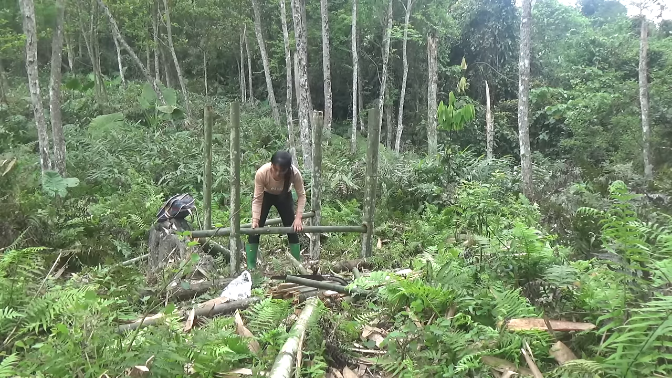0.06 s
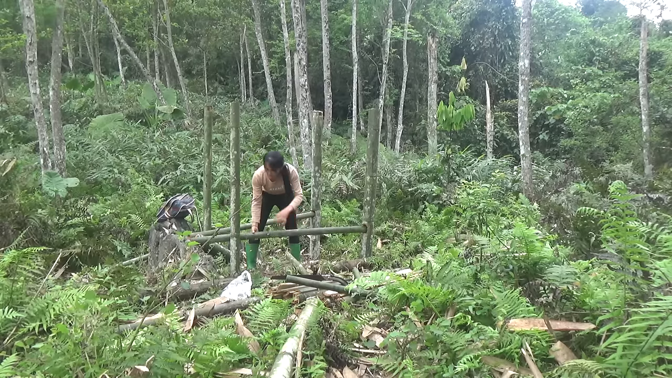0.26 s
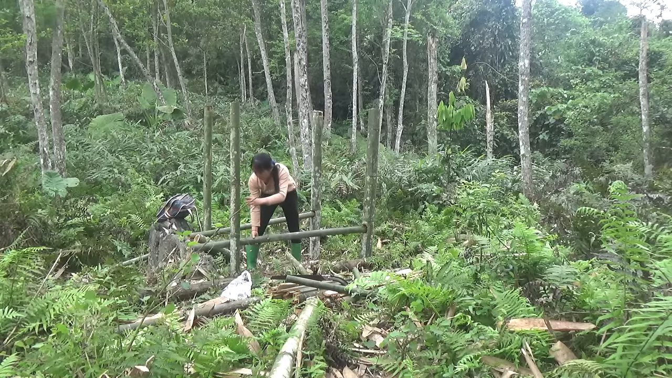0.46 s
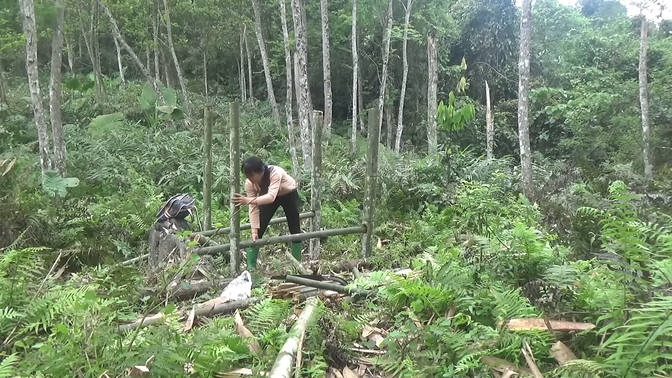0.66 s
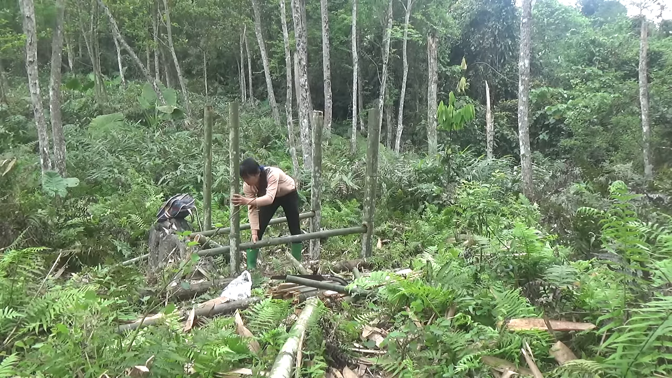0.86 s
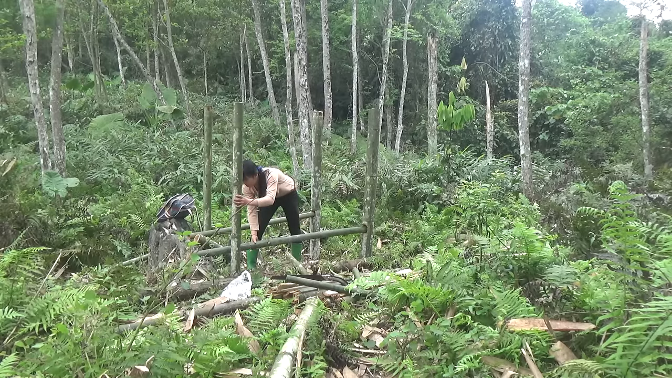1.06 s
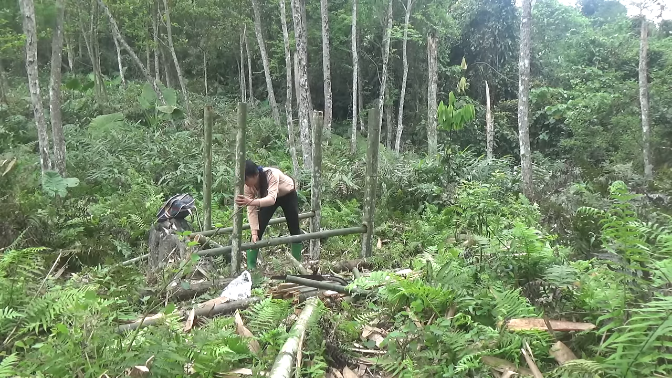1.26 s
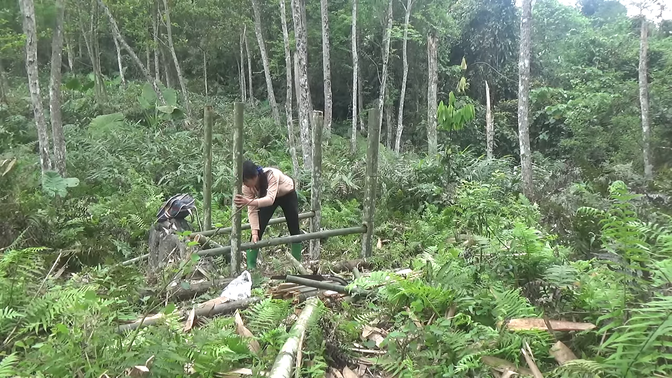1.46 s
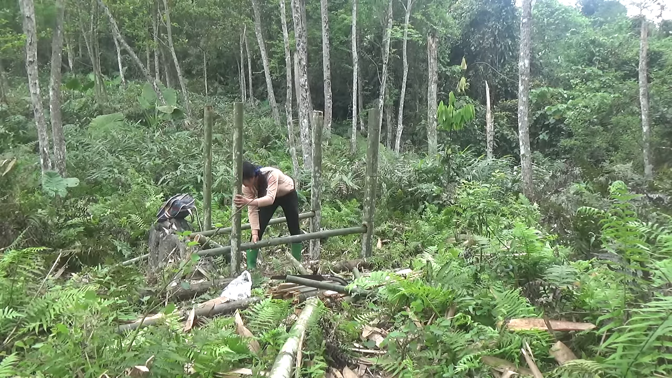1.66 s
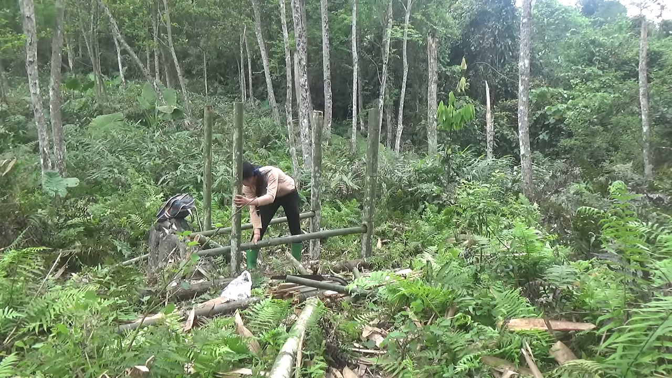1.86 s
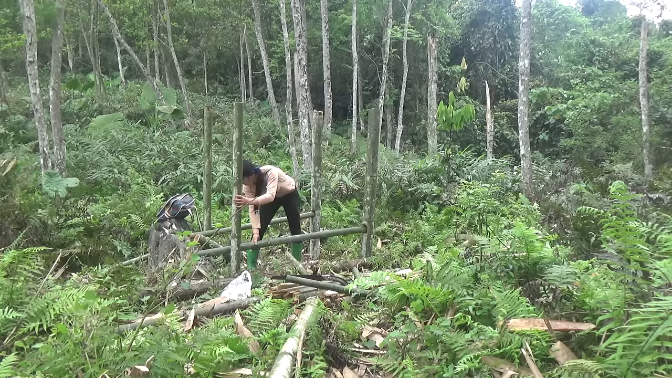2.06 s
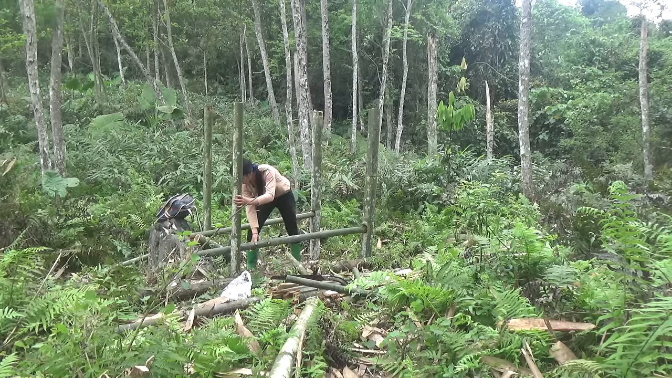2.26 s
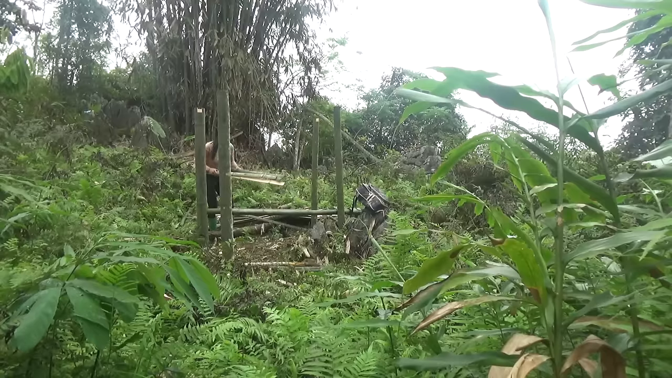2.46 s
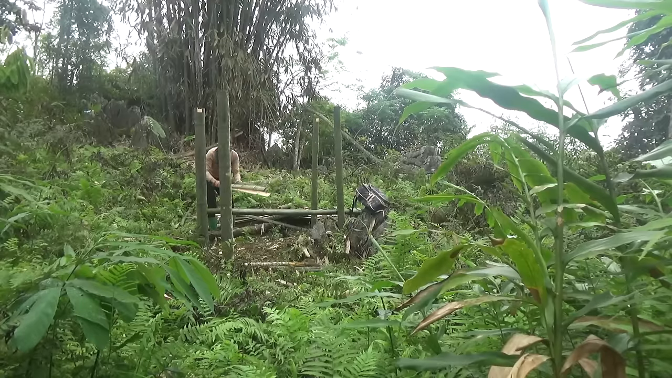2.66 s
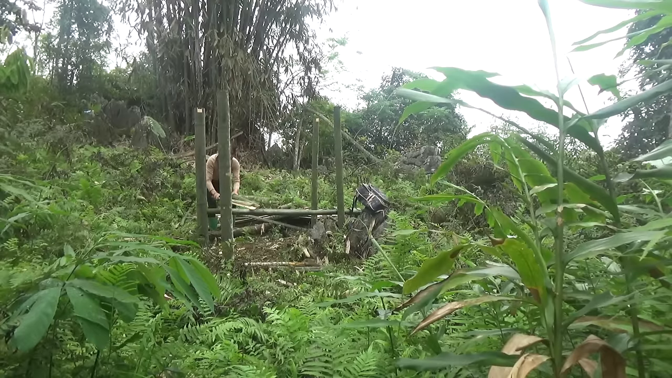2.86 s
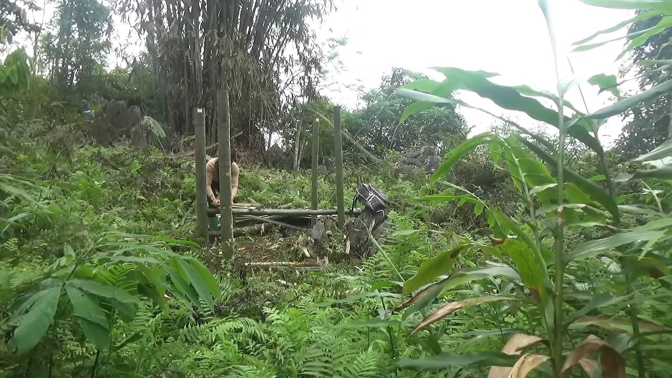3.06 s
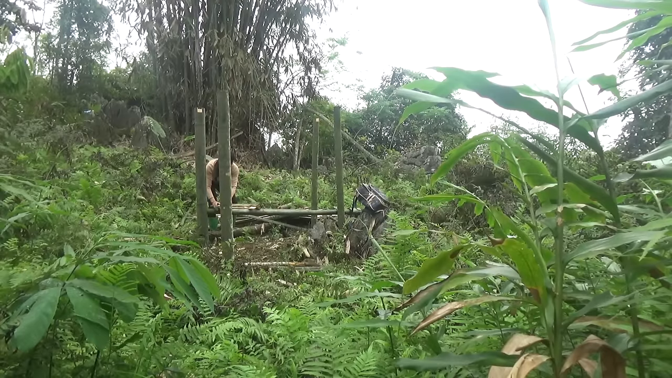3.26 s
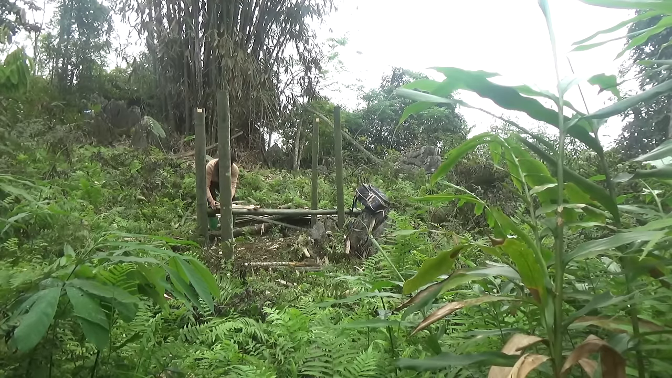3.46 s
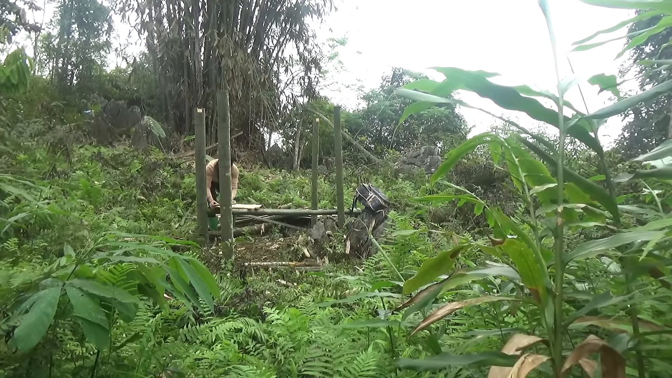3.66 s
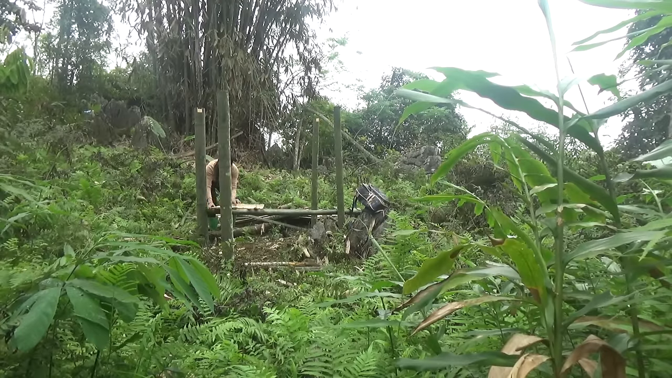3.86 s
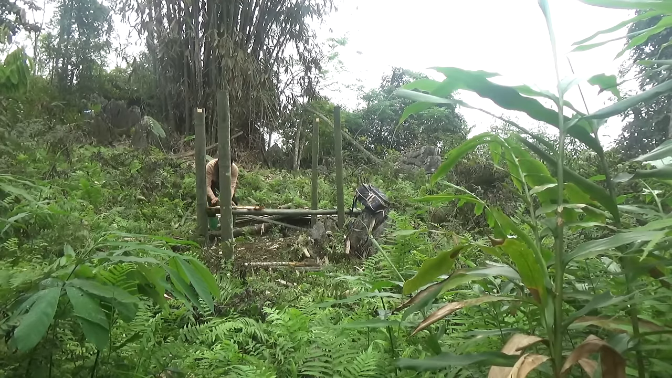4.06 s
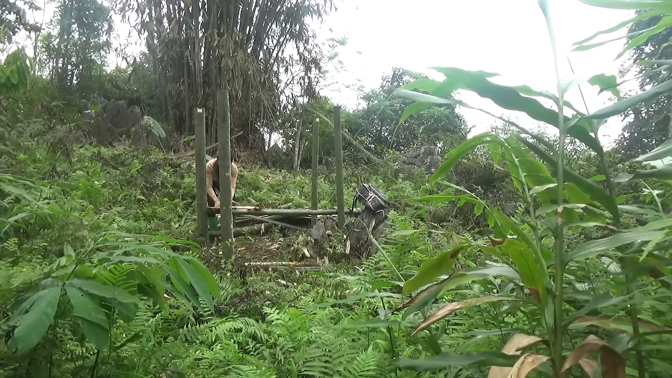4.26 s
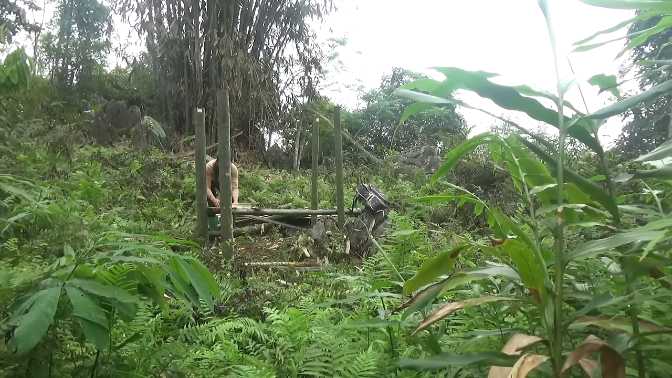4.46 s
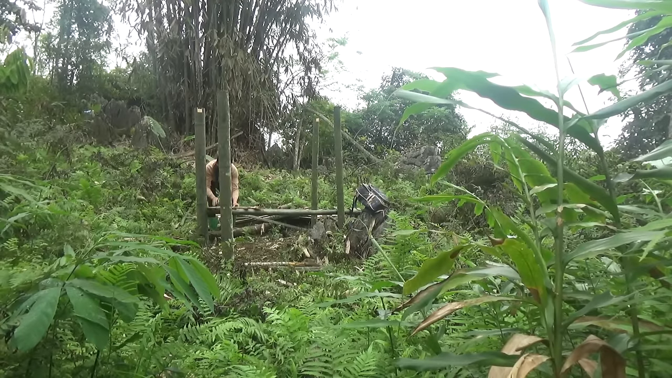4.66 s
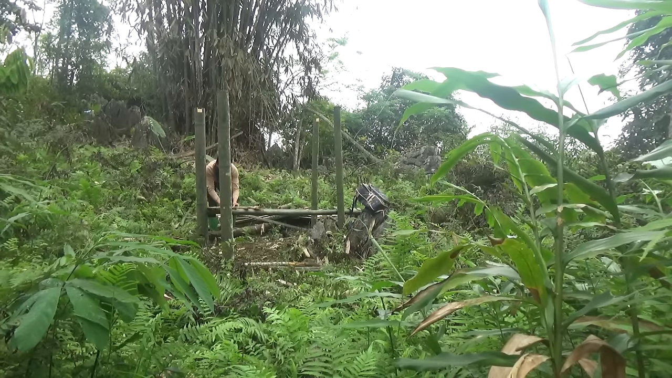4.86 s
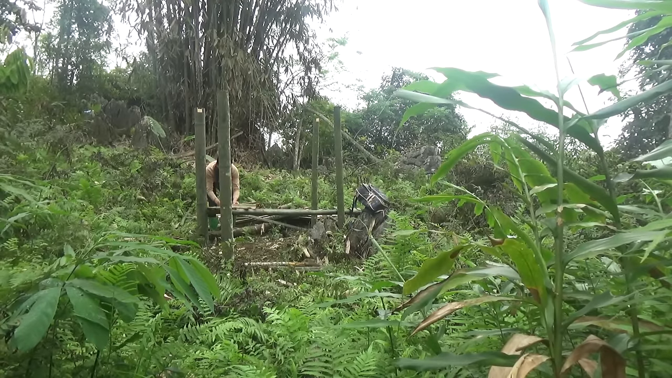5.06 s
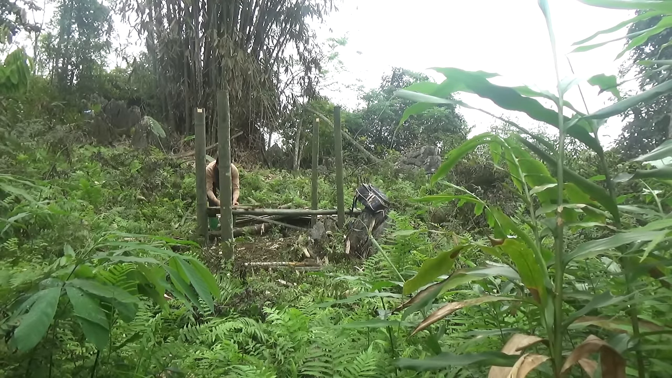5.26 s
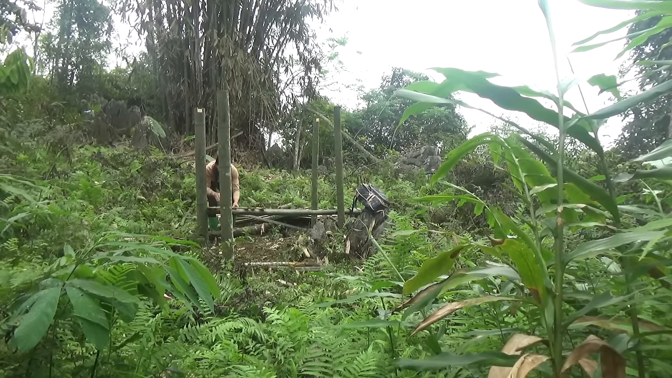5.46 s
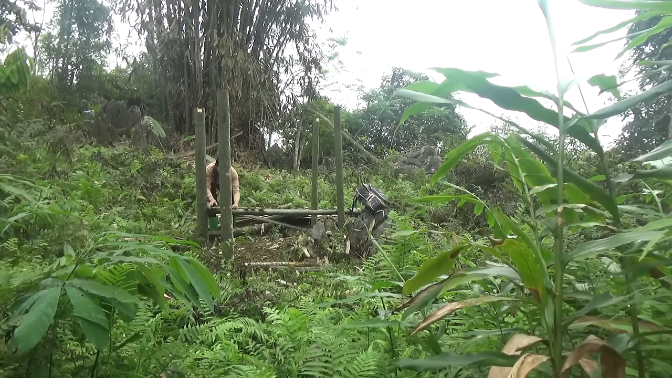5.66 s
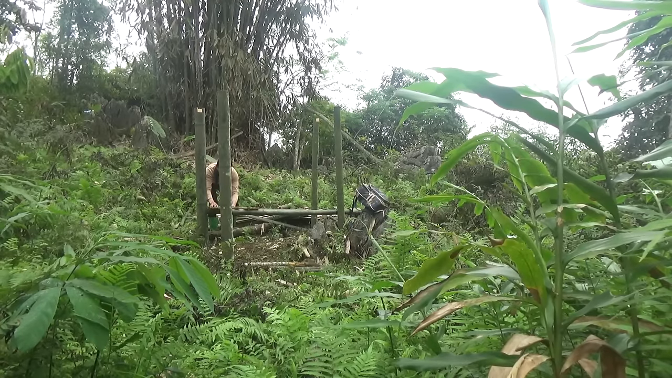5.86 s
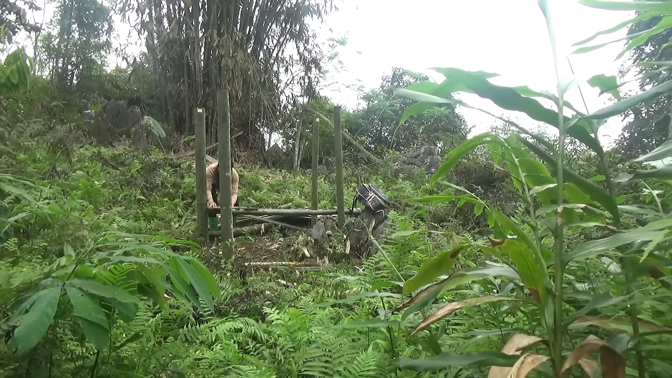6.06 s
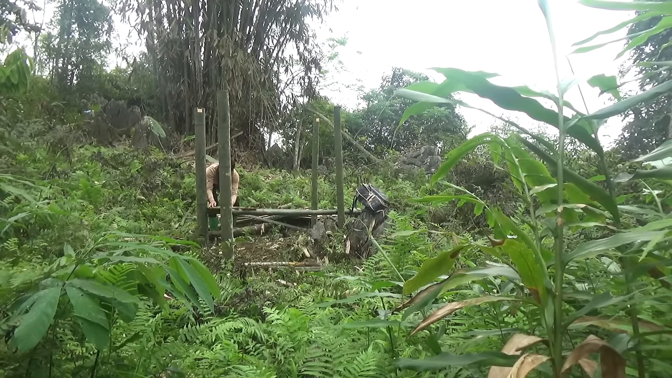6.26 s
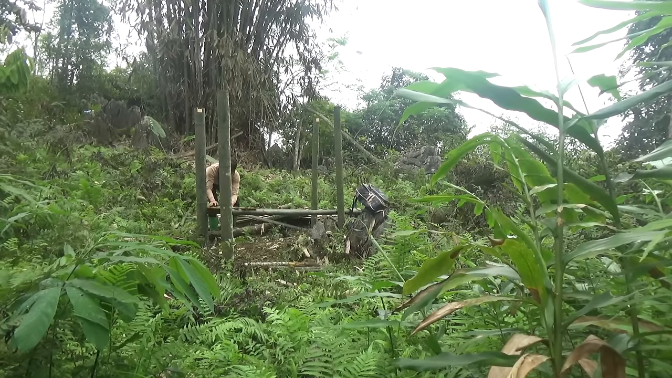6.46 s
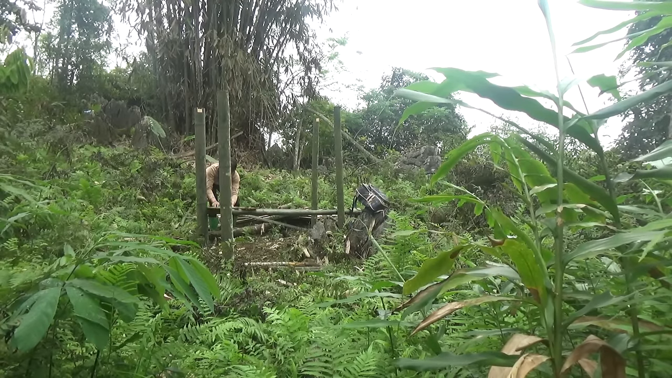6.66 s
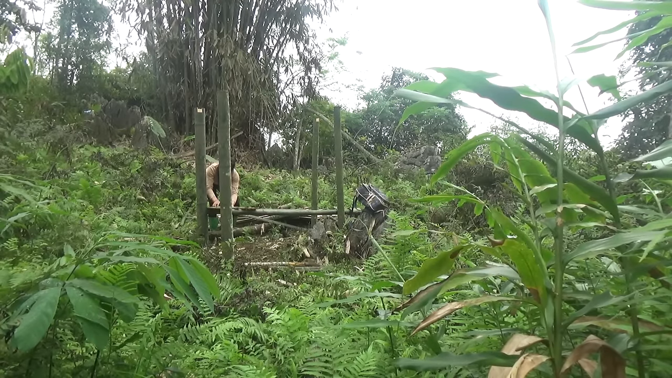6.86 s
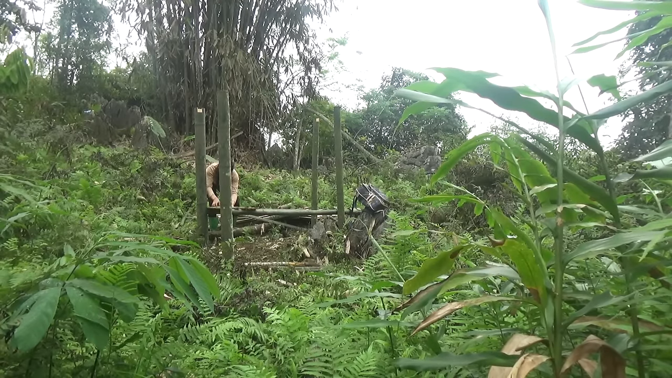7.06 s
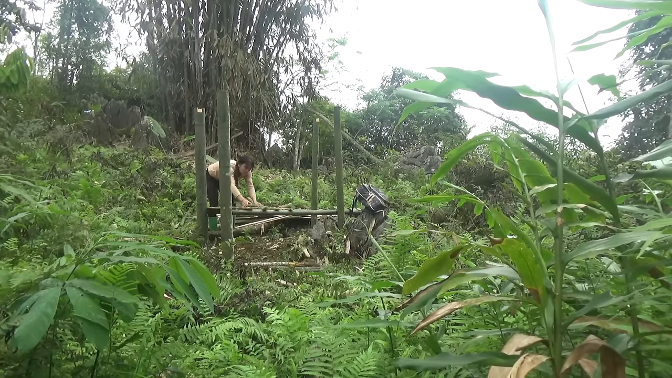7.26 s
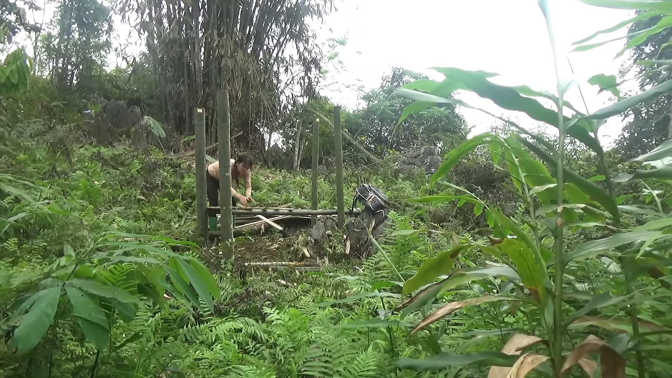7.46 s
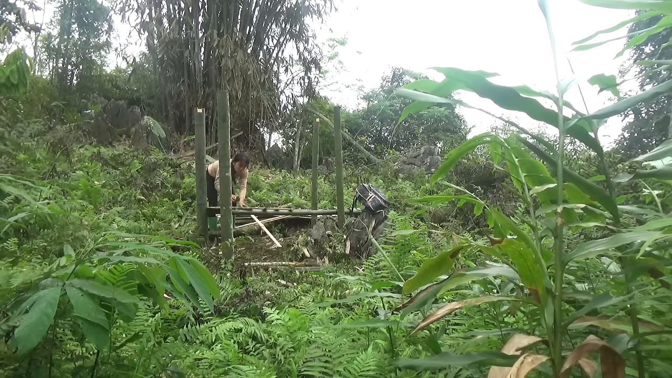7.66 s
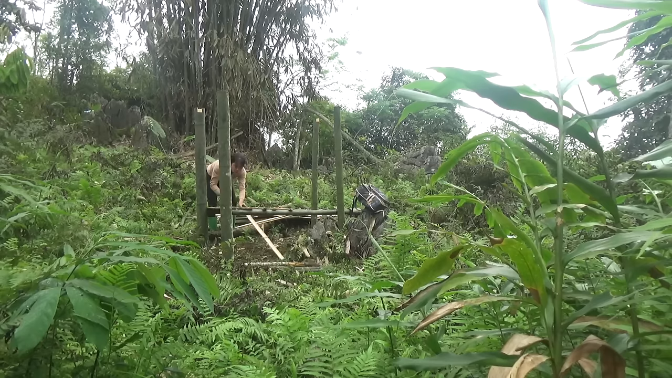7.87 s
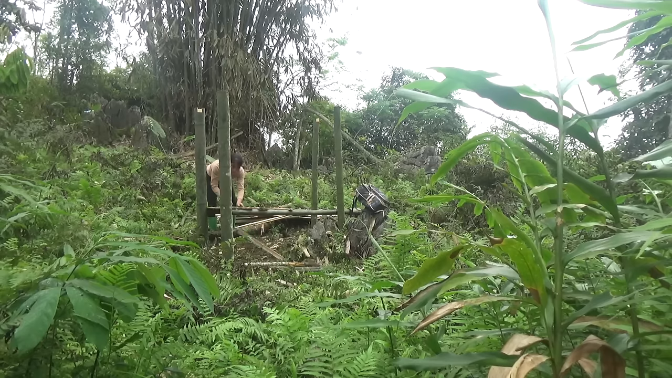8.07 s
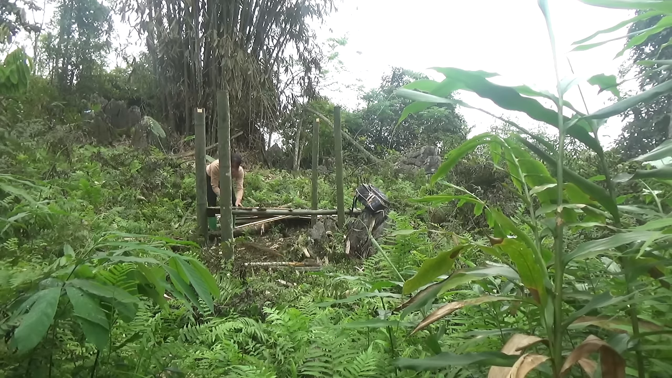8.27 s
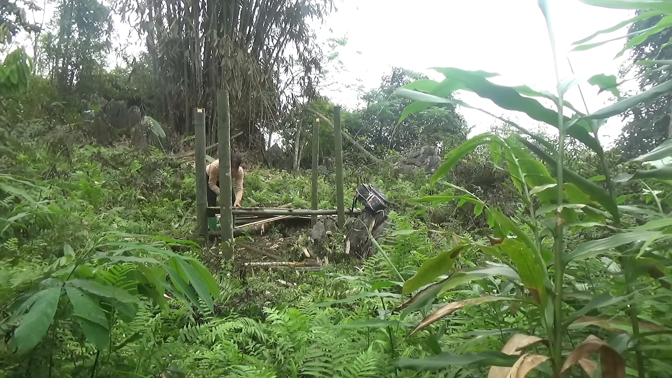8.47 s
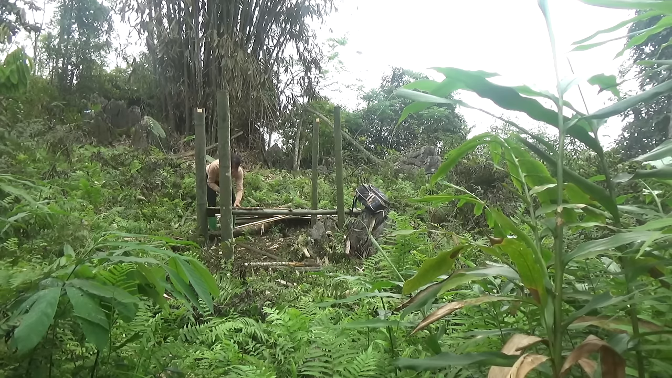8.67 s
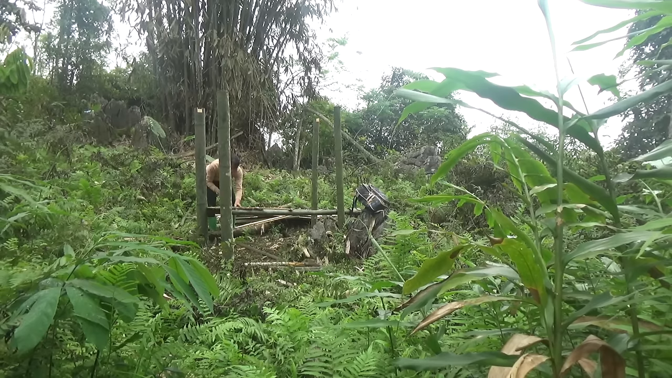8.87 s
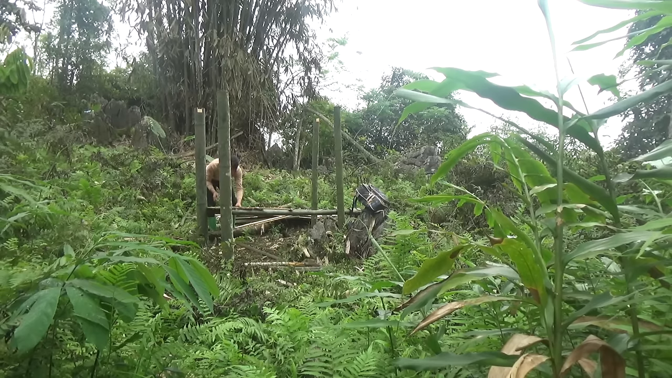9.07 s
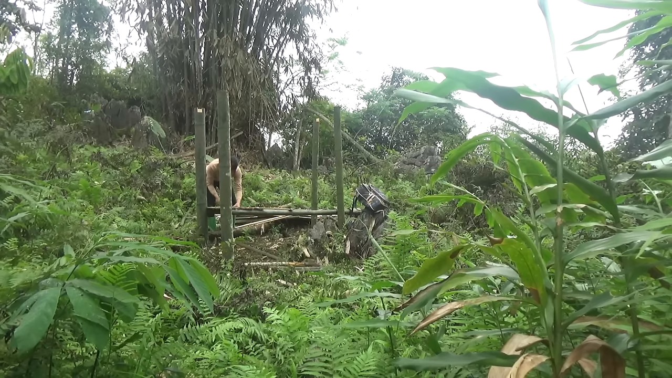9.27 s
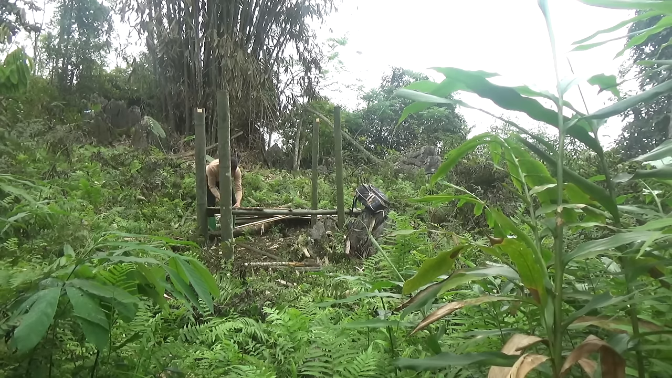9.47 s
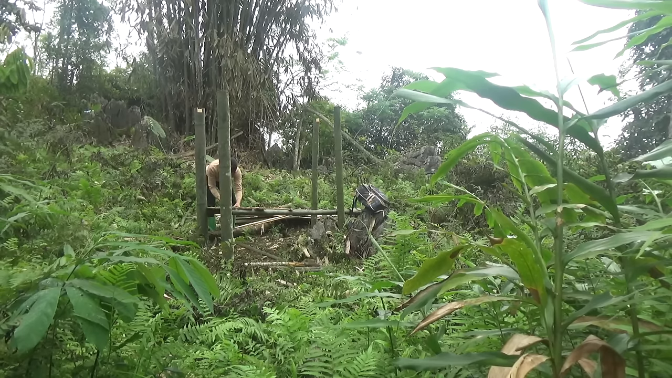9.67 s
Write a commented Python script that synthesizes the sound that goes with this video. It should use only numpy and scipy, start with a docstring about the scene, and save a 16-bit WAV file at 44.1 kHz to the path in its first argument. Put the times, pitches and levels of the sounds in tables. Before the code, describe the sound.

Bamboo tubes are knocked, dragged and wedged together in an open forest clearing. Sparse soft taps lead to a sudden loud clack and a loose run of woody rattles, then a pause with bird whistles and insects. Another brighter burst of clacks follows, with earthy thumps and squeaks, fading to light handling and birds. The microphone hears clear hollow knocks over a soft, wide forest bed.

```python
"""Hollow bamboo poles are knocked, dragged and wedged together in a forest clearing.
Each blow is a short rattle of contacts that excites resonances of the tube walls and the air inside.
Rubbing poles click and hum, filtered random clicks make leaves rustle, and low noise puffs thud on soil.
Noise-band cicadas hiss, a pulsed sine makes a cricket, and gliding sines make bird calls, peeps and squeaks.
Fading noise responses give the echoes of the trunks; shaped noise is the forest bed."""
import sys
import numpy as np
from scipy import signal
from scipy.fft import rfft, irfft, next_fast_len
from scipy.io import wavfile
from scipy.ndimage import uniform_filter1d

SR = 44100
rng = np.random.default_rng(int(sys.argv[2]) if len(sys.argv) > 2 else 0)


def digitize_waveform(pressure):
    """Quantize a signal to 16-bit integers and store it at the path in sys.argv[1].

    Rows of a 2-D input are taken as channels; values are limited to [-1, 1].
    """
    field = np.atleast_2d(pressure).T
    bounded = np.clip(field, -1, 1)
    quanta = np.round(bounded * 32767).astype(np.int16)
    wavfile.write(sys.argv[1], SR, quanta)


N = 428211
T = np.arange(N) / SR
OPPOSED = np.array([[1], [-1]])  # a side signal has opposite signs left and right

# Air columns inside the tubes. Each row: resonance in Hz, width in Hz (blows narrow it), level in dB.
AIR_COLUMNS = [(159.8, 8.3, 6.5), (199, 120, -2), (335, 110, -5.5), (466, 31, -4), (619.4, 47, 0.5)]


def undb(db):
    """A level in decibels is twenty times the logarithm of the gain returned here."""
    return 10 ** (np.asarray(db) / 20)


def unit(x):
    """Dividing by the root mean square gives a signal unit power."""
    return x / np.sqrt(np.mean(x ** 2))


def shape(table, hz):
    """A spectral envelope is interpolated in decibels over logarithmic frequency."""
    f, db = np.transpose(table)
    return undb(np.interp(np.log(hz + 1), np.log(f), db))


def colour(x, response):
    """Linear filtering multiplies the spectrum by a frequency response."""
    size = next_fast_len(x.shape[-1])
    hz = np.arange(size // 2 + 1) * SR / size
    return irfft(rfft(x, size) * response(hz), size)[..., :x.shape[-1]]


def resonance(hz, centre_hz, width_hz):
    """A damped oscillator responds as a causal two-pole band-pass with gain 1 at its centre."""
    return 1j * hz * width_hz / (centre_hz ** 2 - hz ** 2 + 1j * hz * width_hz)


def dull(hz, corner_hz):
    """Two equal first-order lags in cascade form a causal low-pass."""
    return 1 / (1 + 1j * hz / corner_hz) ** 2


def walk(rate):
    """A slow random modulation: normal values held for 1 / rate seconds, then smoothed."""
    hold = int(SR / rate)
    steps = np.repeat(rng.standard_normal(N // hold + 1), hold)
    return uniform_filter1d(steps, hold)[:N]


def contacts(size, rate, spread_db):
    """Contact noise is a random train of impulses, rate per second, of uneven strength."""
    return (rng.random(size) < rate / SR) * rng.standard_normal(size) * undb(spread_db * rng.exponential(size=size))


def pan(x, db):
    """A level difference of left minus right places a source in the stereo image."""
    return x * undb(np.array([[db / 2], [-db / 2]]))


def tone(table, bend_hz=0, gate=1):
    """Frequency modulation: a sine follows rows of (s, Hz, rms dB), its phase summed from its frequency."""
    s, hz, db = np.transpose(table)[:3]
    on = (T > s[0]) & (T < s[-1])
    ends = np.clip(np.minimum(T[on] - s[0], s[-1] - T[on]) / 0.0041, 0, 1)
    pitch = np.interp(T[on], s, hz) + np.broadcast_to(bend_hz, N)[on]
    phase = 2 * np.pi * np.cumsum(pitch) / SR
    out = np.zeros(N)
    out[on] = np.sqrt(2) * undb(np.interp(T[on], s, db)) * ends * np.sin(phase)
    return out * gate


def forest():
    """Far wind and leaves are a diffuse field: shaped noise with uncorrelated mid and side."""
    # Spectrum of the bed. Each row: frequency in Hz, density in relative dB per Hz.
    bed_spectrum = [(15, -36.5), (25, -1), (43, -9), (92, 4.5), (266, 1), (584, -5), (878, -8),
                    (4600, -14.5), (6380, -9.5), (7510, -15), (14400, -19.5), (16500, -35)]
    # Stereo width of the bed. Each row: frequency in Hz, side minus mid level in dB.
    side_spectrum = [(60, -20), (110, -18), (200, -15), (380, -13), (700, -13.5), (1290, -13.5),
                     (2380, -35), (4400, -26), (8120, -8), (15000, -21.5)]
    mid = unit(colour(rng.standard_normal(N), lambda f: shape(bed_spectrum, f)))
    side = unit(colour(rng.standard_normal(N), lambda f: shape(bed_spectrum, f)))
    side = colour(side, lambda f: shape(side_spectrum, f))
    level_db = -66.5 + 0.6 * walk(1.5)
    return undb(level_db) * (mid + side * OPPOSED)


def cicadas():
    """Many unsynchronised singers merge into a noise band, here set by two cascaded resonances."""
    centre_hz, stage_width_hz, mean_db = 6530, 560, -75.5
    mid, side = colour(rng.standard_normal((2, N)), lambda f: resonance(f, centre_hz, stage_width_hz) ** 2)
    return undb(mean_db + 0.8 * walk(4.8)) * (unit(mid) + undb(-14) * unit(side) * OPPOSED)


def cricket():
    """Stridulation is amplitude modulation: a few wing pulses a chirp gate a steady carrier."""
    # Bouts of chirping. Each row: first chirp in seconds, end in seconds, chirp period in seconds.
    bouts = [(2.338, 2.9, 0.062), (3.069, 4.2, 0.056), (4.247, 7.75, .1013)]
    carrier_hz, pulse_hz, chirp_s = 5660, 69, 0.034
    jitter_s, mean_db, scatter_db = 0.004, -60, 0.8
    gate = np.zeros(N)
    t = np.arange(int(chirp_s * SR)) / SR
    pulses = 0.067 + 0.65 * np.sin(np.pi * pulse_hz * t) ** 2
    chirp = pulses * np.sin(np.pi * t / chirp_s) ** 0.38
    starts = np.concatenate([np.arange(*bout) for bout in bouts])
    for s, (late, loud) in zip(starts, rng.standard_normal((80, 2))):
        i = int((s + jitter_s * late) * SR)
        gate[i:i + len(t)] = undb(mean_db + scatter_db * loud) * chirp
    return gate * np.sin(2 * np.pi * carrier_hz * T)


def whine():
    """A thin high insect tone is a sine with random frequency and amplitude modulation."""
    # Track of the tone. Each row: time in seconds, mean frequency in Hz, mean level in dB.
    whine_track = [(3.05, 13250, -86), (6.5, 13250, -84), (6.7, 13250, -105), (7.15, 13250, -100),
                   (7.25, 13250, -85), (9.71, 13250, -84)]
    return tone(whine_track, 25 * walk(200), undb(2.5 * walk(30)))


def trunks(x, t60, dull_hz, side_db):
    """Scattering from stems and ground: convolution with noise that decays 60 dB in t60 seconds."""
    t = np.arange(SR) / SR
    noise = rng.standard_normal((2, SR)) * undb(-60 * t / t60) * np.minimum(t / 0.036, 1)
    mid, side = colour(noise, lambda f: 1 / (1 + 1j * f / dull_hz))
    response = (mid + undb(side_db) * side * OPPOSED) / np.sqrt(np.sum(mid ** 2))
    return signal.fftconvolve(x[None], response, axes=1)[:, :N]


def trill(table, rate, share, sweep_hz, pan_db, direct_db):
    """A falling sweep repeats; its power is shared between direct sound and the echo feed, both returned."""
    turns = np.cumsum((T >= table[0][0]) * rate * (1 + 0.03 * walk(30))) / SR
    place = np.minimum(turns % 1 / share, 1)  # 0 to 1 through a note, then a rest
    swell = np.sin(np.pi * place) ** 0.43 / np.sqrt(share / 2)
    notes = tone(table, sweep_hz * (0.5 - place) + 75 * walk(400), swell)
    return undb(direct_db) * pan(notes, pan_db), np.sqrt(1 - undb(direct_db) ** 2) * notes


def whistles_and_squeaks():
    """Calls, peeps and squeaks are gliding sines; the far calls are mostly echo. Returns direct, echo feed."""
    # Near whistles, one list for each. Each row: time in seconds, frequency in Hz, level in dB.
    near_calls = [
        [(3.67, 2950, -60), (3.7, 3010, -56), (3.722, 3330, -51.5), (3.738, 2750, -50.5), (3.756, 2710, -54),
         (3.765, 2080, -63), (3.78, 2220, -50), (3.82, 1810, -67)],
        [(4.96, 2850, -57), (5.012, 3070, -56.5), (5.055, 2030, -63), (5.085, 2205, -62), (5.125, 2200, -58),
         (5.155, 2550, -59), (5.18, 2450, -72)],
    ]
    # Far whistles, one list for each. Each row: time in seconds, mean frequency in Hz, echo-feed level in dB.
    far_calls = [
        [(6.055, 2060, -57), (6.085, 2726, -69), (6.14, 2415, -56.5), (6.175, 2696, -71), (6.21, 2490, -72),
         (6.32, 2306, -61), (6.43, 2390, -64), (6.5, 2994, -68), (6.6, 3030, -86)],
        [(6.22, 2730, -63), (6.34, 2794, -63), (6.4, 3060, -64), (6.46, 2960, -61)],
        [(4.08, 6020, -74), (4.14, 6110, -64), (4.27, 4700, -69), (4.33, 4700, -70), (4.4, 6020, -66),
         (4.47, 6200, -63), (4.56, 6870, -69.5)],
        [(4.5, 4770, -77), (4.55, 4800, -64), (4.575, 3900, -66.5), (4.65, 3900, -79.5)],
    ]
    # Peeps and pole squeaks. Each row: start and length in seconds, first and last frequency in Hz, first level in dB.
    peep_rows = [(1.02, .018, 3450, 3280, -64.5), (1.11, .035, 3800, 3700, -68),
                 (1.742, .02, 3400, 3250, -67), (3.506, 0.031, 1970, 2210, -49.5),
                 (8.409, 0.024, 3340, 3360, -56), (8.458, 0.011, 3810, 3580, -43),
                 (8.46, 0.021, 2780, 2740, -53.5), (8.708, 0.053, 5030, 5060, -77),
                 (9.522, 0.061, 1860, 2020, -69), (9.582, .03, 4830, 4800, -66)]
    fade_db = 7
    peeps = [[(s, first_hz, db), (s + length, last_hz, db - fade_db)]
             for s, length, first_hz, last_hz, db in peep_rows]
    near = sum(tone(call) for call in near_calls + peeps)
    far = sum(tone(call, 110 * walk(60)) for call in far_calls)
    return pan(near + undb(-4) * far, 0.74), undb(-12.5) * near + far


def buzzing_bird():
    """Note repetition at a buzzing rate, under an envelope that swells and drops. Returns direct, echo feed."""
    # Each row: start in seconds, length in seconds, share of it that swells, frequency in Hz, crest in dB.
    buzz_rows = [(5.023, 0.26, 0.89, 4120, -56.5), (8.801, 0.27, 0.86, 4100, -64),
                 (9.601, 0.14, 0.04, 4120, -62.5)]
    # In order: notes a second, sounding share of a note, left minus right in dB, direct sound in dB,
    # sweep of a note in Hz, first and last level relative to the crest in dB.
    buzz_settings = (43, 0.8, -3.5, -1, 488.5, -10, -10)
    rate, share, pan_db, direct_db, sweep_hz, first_db, last_db = buzz_settings
    direct, sung = 0, 0
    for s, length, swell, hz, db in buzz_rows:
        track = [(s, hz, db + first_db), (s + swell * length, hz, db), (s + length, hz, db + last_db)]
        near, far = trill(track, rate, share, sweep_hz, pan_db, direct_db)
        direct, sung = direct + near, sung + far
    return direct, sung


def rattling_bird():
    """Note repetition slow enough to be heard as separate falling sweeps. Returns direct, echo feed."""
    # Each row: start in seconds, length in seconds, frequency in Hz, first level in dB,
    # sweep of a note in Hz, direct sound in dB.
    rattle_rows = [(1.09, .04, 4660, -68, 900, -1.5), (1.182, .23, 4010, -69, 1103, -1),
                   (5.365, 0.41, 4180, -68, 1005, -9.5), (9.141, 0.43, 4150, -71, 1644, -4)]
    # In order: notes a second, sounding share of a note, left minus right in dB, last level relative to first in dB.
    rattle_settings = (20.1, 0.45, 0, -2.5)
    rate, share, pan_db, last_db = rattle_settings
    direct, sung = 0, 0
    for s, length, hz, db, sweep_hz, direct_db in rattle_rows:
        track = [(s, hz, db), (s + length, hz, db + last_db)]
        near, far = trill(track, rate, share, sweep_hz, pan_db, direct_db)
        direct, sung = direct + near, sung + far
    return direct, sung


def calls():
    """Superposition of bird calls, peeps and pole squeaks, as direct sound and as what the trunks scatter."""
    direct, scattered = zip(whistles_and_squeaks(), buzzing_bird(), rattling_bird())
    return sum(direct), sum(scattered)


def thuds():
    """A foot or pole end on soil meets heavy damping: a broad low resonance of a brief noise puff."""
    # Each row: time in seconds, peak level in dB, centre frequency in Hz.
    thud_rows = [(0.631, -55, 130), (1.4, -51.5, 187), (6.509, -51.5, 120), (7.99, -48, 260),
                 (8.072, -46, 200), (8.199, -46, 75.4)]
    crest_s = 0.011
    out = np.zeros(N)
    t = np.arange(8192) / SR
    envelope = t / crest_s * np.exp(1 - t / crest_s)
    for s, db, hz in thud_rows:
        noise = rng.standard_normal(len(t)) * envelope
        puff = colour(noise, lambda f: resonance(f, hz, 1.05 * hz) ** 2)
        i = int(s * SR)
        out[i:i + len(t)] += undb(db) * puff / np.abs(puff).max()
    return out


def tubes(hz, scatter_db, damping):
    """Modal synthesis of the tube walls; the point of touch weights and signs the modes anew."""
    # Wall modes. Each row: mean frequency in Hz, mean level in dB,
    # 60 dB decay in seconds (capped at 0.25 and divided by the damping).
    wall_modes = [(424, 1.5, 5.0), (689, -18.5, 1.1), (744.3, 4, 5.0), (855, 3, 0.15), (1032, 6, 0.16),
                  (1226, -28, 0.48), (1366, 4, 0.29), (1585, 2, 0.054), (1680, -7, 0.092),
                  (1901, 2.5, 0.078), (1930, -13, 0.043), (2265, -1.5, 0.046), (2265, -4, 0.27),
                  (2482, 3, 0.033), (2800, -9, 0.043), (2890, -4, 0.33), (3050, 1, 0.11),
                  (2900, -26.5, 0.19), (3650, -24.5, 0.55), (4230, -26, 0.29), (4240, -7, 0.29),
                  (4080, -21, 0.45), (4070, -26, 0.17), (4936, -39, 0.19)]
    response = 0
    for (f, db, t60), (loud, detune) in zip(wall_modes, rng.standard_normal((len(wall_modes), 2))):
        width_hz = damping * np.log(1000) / np.pi / min(t60, 0.25)
        gain = np.sign(detune) * undb(db + scatter_db * loud)
        response = response + gain * resonance(hz, f * (1 + 0.014 * detune), width_hz)
    return response


def handling():
    """Stick-slip clicks ring the poles, random contacts crackle in leaves, and air columns resonate."""
    # How hard the poles rub. Each row: time in seconds, rubbing in dB (the slips lie 5.5 dB lower).
    rubbing = [(0, -68), (.4, -85), (1.04, -72.5), (2.32, -99), (2.35, -59.5), (2.92, -69.5), (3.07, -49),
               (3.32, -59.5), (3.5, -55), (4.2, -64), (4.66, -62.5), (4.82, -43.5), (5.0, -62),
               (5.37, -65.5), (5.5, -45), (5.65, -61.5), (6.46, -69), (7.2, -76.5), (7.43, -51), (7.6, -54),
               (7.8, -55), (8.06, -48.5), (8.22, -64), (9.15, -71), (9.71, -73.5)]
    # Leaves brushed. Each row: crest in seconds, rise in seconds, hold in seconds, level in dB.
    rustle_rows = [(0, .05, .05, -77), (0.825, .1, .05, -83), (2.345, .012, 0.34, -62),
                   (3.805, 0.45, 0.23, -69), (4.386, 0.38, 0.083, -58), (4.604, .1, 0.13, -68.5),
                   (5.14, 0.6, 0.042, -74), (5.705, .15, 0.65, -71.5), (7.86, .2, .2, -68.5),
                   (8.249, .1, 0.49, -75)]
    # Spectrum of leaves. Each row: frequency in Hz, density in relative dB per Hz.
    leaf_spectrum = [(470, -43.5), (800, 2), (1350, -17), (1500, -19), (3690, -10.5), (6330, 3.5),
                     (13600, -1.5), (16000, -15)]
    fade_db_s, rest_db = 60.5, -84
    rub_db = np.interp(T, *np.transpose(rubbing))
    rustle = undb(rest_db)
    for s, rise, hold, db in rustle_rows:
        growth = np.clip(1 + (T - s) / rise, 0, 1) ** 2
        rustle = rustle + growth * undb(db - fade_db_s * np.maximum(T - s - hold, 0))

    slips = colour(contacts(N, rate=2500, spread_db=1.9),
                   lambda f: resonance(f, 1400., 2200.) * undb(-6) + tubes(f, scatter_db=1.5, damping=1.4))
    crackle = contacts(N, rate=9800, spread_db=1.5) * undb(3.2 * walk(25))
    leaves = colour(crackle, lambda f: shape(leaf_spectrum, f))
    air = colour(rng.standard_normal(N), lambda f: sum(undb(g) * resonance(f, c, w) for c, w, g in AIR_COLUMNS))
    # hum is -63.5 dB at -58 dB of rubbing and follows it by 0.93 dB per dB; sweeping through leaves adds more
    hum = undb(-63.5 + 0.93 * (rub_db + 58)) + undb(-11) * rustle
    return pan(undb(rub_db - 5.5) * unit(slips), 0.42) + rustle * unit(leaves) + pan(hum * unit(air), 1.5)


def blows():
    """Impact excitation: a dying rattle of contacts cracks, rings the walls and thumps the air inside."""
    # Each row: start in seconds, level in dB, brightest frequency in Hz, treble in dB (the crack lies 5 dB lower),
    # bass in dB, rattle length in seconds, note of the pole in dB; the last three levels are relative to the first.
    blow_rows = [(0.626, -49.5, 900, -25, 8.5, 0.0084, -20), (0.784, -43, 8060, -21, -39, 0.0025, -22),
                 (1.401, -65, 471, -4, 11, 0.023, -15), (2.124, -57, 6360, -3, -17, .007, -24),
                 (2.44, -49.5, 1010, 1, -30, 0.013, -9), (2.901, -21.5, 1883, 9, -16, 0.025, -3),
                 (2.931, -13.5, 2800, -30, -17.5, .008, -16), (2.977, -38.5, 1020, 1.5, -9, 0.078, -12),
                 (3.02, -12.5, 2220, -0.5, -20, 0.012, -25), (3.073, -34, 910, -1, -22, 0.0094, 0),
                 (3.177, -32.5, 1572, -9.5, 0.5, 0.018, -7), (3.209, -40.5, 990, -20, 5, 0.022, 4),
                 (3.252, -28, 1000, -12, -22, 0.01, -25), (3.347, -33, 1780, -7, -11, 0.012, -17),
                 (3.372, -33, 1610, -14, -30, 0.044, -24), (3.387, -21, 1490, -7, -15.5, 0.03, -12),
                 (3.471, -34.5, 2130, -28, -4, 0.016, -7), (3.604, -35.5, 1510, -10, -8, .012, -31),
                 (3.676, -42, 1520, -37, -30, .0065, 4), (3.821, -23.5, 2110, -3.5, -33, 0.012, -8.5),
                 (3.889, -32.5, 2130, -4.5, -9, 0.016, -4.5), (3.928, -40.5, 944, 6, -8, .011, -16),
                 (3.971, -38.5, 1500, -7, -4, 0.015, -25), (4.169, -37, 2140, -9, -6.5, .03, -8),
                 (4.217, -31, 1120, -11, -17, 0.022, -4), (4.243, -32, 1070, -12, -11, 0.03, -27),
                 (4.315, -39, 2200, -4, -4.5, 0.012, -10), (4.633, -27.5, 2270, -10, -5, 0.0089, -4.5),
                 (4.7, -35.5, 934, -28, -40, 0.016, -6), (4.72, -15.5, 2110, -7, -14, 0.026, -5.5),
                 (4.791, -26.5, 1410, -13, -40, 0.03, -11), (5.012, -43, 2680, -21, -12, 0.015, -15),
                 (5.104, -57, 2260, 13.5, -29, 0.025, -20), (5.332, -33, 464, -0.5, -25, 0.016, -32),
                 (5.403, -21.5, 2950, 3.5, -7, 0.013, -5.5), (5.44, -23.5, 1584, -4.5, -35, 0.015, -10),
                 (5.49, -30.5, 1930, -5, -30, 0.019, 1), (5.515, -34, 1020, -7, -5, 0.028, 0),
                 (5.571, -36, 980, -23, -9.5, 0.029, -27), (5.817, -44.5, 770, -3, -6, .033, -28),
                 (5.879, -45, 980, -0.5, -1, 0.042, -34), (6.171, -54, 2480, -17, 8, 0.0042, 5),
                 (6.209, -44, 1780, -11, -5, 0.0094, -9), (6.508, -62.5, 3010, -22, 14.5, 0.016, -15),
                 (7.252, -30, 1750, -19, -35, 0.012, -6), (7.285, -24, 1770, -3.5, -13, 0.012, -28),
                 (7.305, -27.5, 1770, 0, -15.5, 0.022, -9), (7.359, -35.5, 845, -14, -29, 0.019, -22),
                 (7.376, -30, 1520, -15, -11, 0.019, -31), (7.413, -34, 826, -13, -17, 0.017, -23),
                 (7.445, -19.5, 1177, -2.5, -13, 0.017, -20), (7.53, -30.5, 1080, -11, -12, 0.038, -2.5),
                 (7.548, -18.5, 1840, -13, -19, 0.0079, -18), (7.571, -39.5, 960, -23, -8, 0.019, 5),
                 (7.673, -21.5, 1090, -1.5, -12.5, 0.01, -9.5), (7.788, -13, 3180, 4.5, -32, 0.01, -16),
                 (7.834, -9.5, 4540, -3.5, -22.5, 0.0079, -12.5), (7.921, -47, 5400, 8, -29, 0.11, -23),
                 (7.979, -19.5, 1800, -7.5, -8, 0.01, -6), (8.025, -28, 1570, -8, -35, 0.022, -9),
                 (8.142, -45, 1890, -17, -0.5, 0.024, -15), (8.166, -35.5, 1290, -12, -13, 0.021, -7),
                 (8.192, -49.5, 820, 9, 1, 0.036, -23), (8.403, -60.5, 3900, 13, -22, 0.094, -32),
                 (8.464, -49, 3920, -30, -30, 0.0061, -27), (8.485, -39.5, 1640, -5.5, -7.5, 0.02, -12),
                 (8.55, -40, 1840, -6.5, -0.5, 0.024, -7), (8.643, -40, 1040, -30, -15, 0.0084, -28)]
    # Pole in hand. Each row: taken up at seconds, note in Hz, width in Hz, second note in Hz, its relative dB,
    # third note in Hz, its relative dB.
    poles = [(0, 1045, 24, 1610, -9, 745, -12), (7.0, 988, 37, 1875, -9, 700, -10.5),
             (7.75, 1112, 13, 1338, -1.5, 861, -7)]
    t = np.arange(12288) / SR
    out = np.zeros((2, N + len(t)))
    for s, db, hz, treble_db, bass_db, length, note_db in blow_rows:
        _, note_hz, width, second_hz, second_db, third_hz, third_db = [pole for pole in poles if pole[0] <= s][-1]
        # neighbouring poles go on chattering faintly after the blow
        fade = np.exp(-t / length) + undb(-22) * np.exp(-t / (1.55 * length))
        push = contacts(len(t), rate=9000, spread_db=1.5) * fade * np.minimum(t / (0.12 * length), 1)
        push[0] += 2.5  # a hard first touch
        snap = contacts(len(t), rate=12000, spread_db=3.0) * np.exp(-t / (0.5 * length))
        snap[0] += 4.0

        # a softer contact lasts longer and leaves out the high modes
        body = colour(push, lambda f: resonance(f, hz, 2.86 * hz) ** 2 * dull(f, 2500 + 1.78 * hz) ** 2
                      * (undb(-7) + tubes(f, scatter_db=4.5, damping=3.7)))
        # the patch of wall under the blow; brighter blows favour it
        knock = colour(push * np.exp(-t / length), lambda f: resonance(f, hz, 0.72 * hz) ** 2)
        knock_db = -7 + 5.8 * np.log2(hz / 2000)
        crack = colour(snap, lambda f: resonance(f, 8900.0, 4600.0) * dull(f, 7200.0) * dull(f, 4700.0))
        thump = colour(push, lambda f: resonance(f, 320.0, 500.)
                       * sum(undb(g) * resonance(f, c, 0.91 * w) for c, w, g in AIR_COLUMNS))
        note = colour(push, lambda f: resonance(f, note_hz, width)
                      + undb(second_db) * resonance(f, second_hz, width)
                      + undb(third_db) * resonance(f, third_hz, width))

        parts = ((body, 0), (knock, knock_db), (crack, treble_db - 5), (thump, bass_db), (note, note_db))
        # every part has unit energy before its level; the energy grows with the rattle length
        blow = sum(undb(db + part_db) * part / np.sqrt(np.sum(part ** 2)) for part, part_db in parts)
        i = int(s * SR)
        out[:, i:i + len(t)] += pan(blow * np.sqrt(0.089 * length * SR), 1.15)
    return out[:, :N]


def scene():
    """Superposition: poles nearly dry, calls with longer and stronger echoes, all over the forest."""
    # How much the two channels differ on the poles. Each row: frequency in Hz, gain of the difference in dB.
    lean_spectrum = [(60, -3.5), (300, 8.5), (1000, 5.5), (2000, -2), (5000, -1.5), (12000, 3.5)]
    knocks, (call, echo_feed) = blows(), calls()
    lean = colour(knocks[0] - knocks[1], lambda f: shape(lean_spectrum, f)) / 2
    knocks = knocks.mean(axis=0) + lean * OPPOSED
    knock_echo = trunks(undb(-25) * knocks.mean(axis=0), t60=0.33, dull_hz=3970.0, side_db=-34)
    call_echo = trunks(echo_feed, t60=0.84, dull_hz=9250.0, side_db=-20.5)
    insects = cricket() + cicadas() + whine()
    return knocks + thuds() + handling() + knock_echo + call + call_echo + insects + forest()


def record(dry):
    """Band limiting: a gentle high-pass at 52 Hz thins the bass, a steep low-pass at 16 kHz cuts the top."""
    thin = signal.sosfilt(signal.butter(2, 52., "high", fs=SR, output="sos"), dry)
    return signal.sosfilt(signal.ellip(10, .2, 80, 16000, fs=SR, output="sos"), thin)


dry = scene()
out = record(dry)
digitize_waveform(out)
```